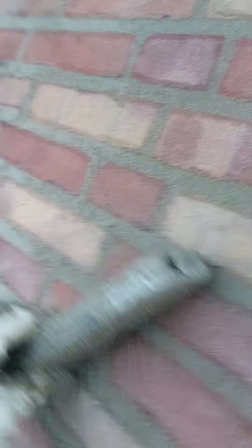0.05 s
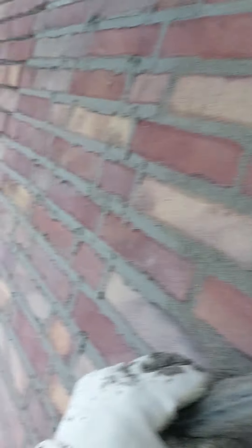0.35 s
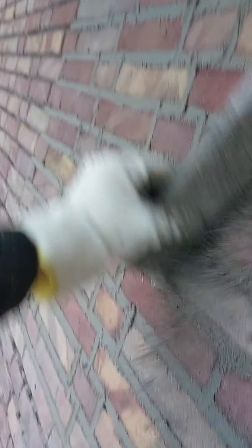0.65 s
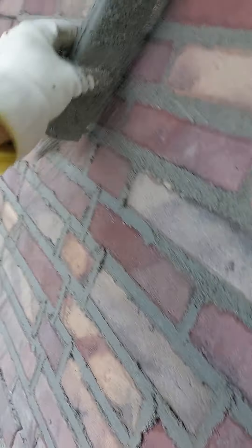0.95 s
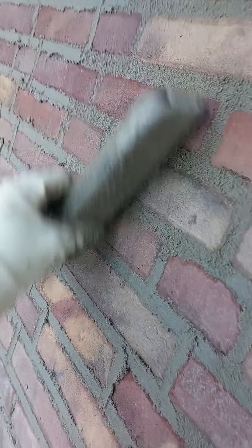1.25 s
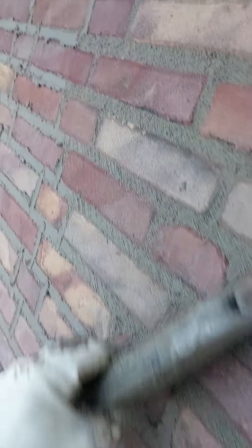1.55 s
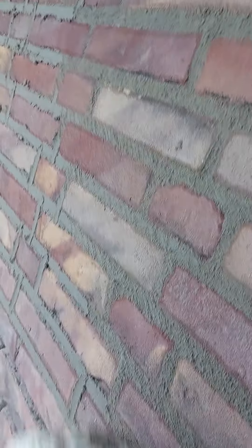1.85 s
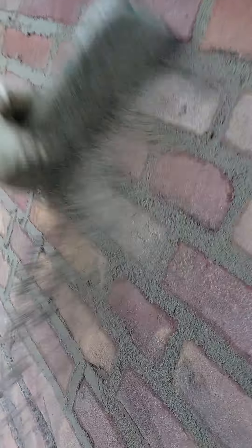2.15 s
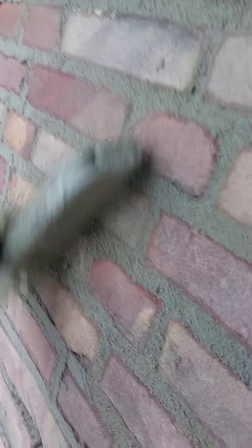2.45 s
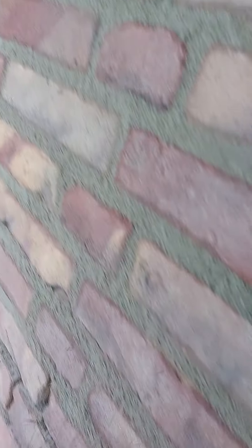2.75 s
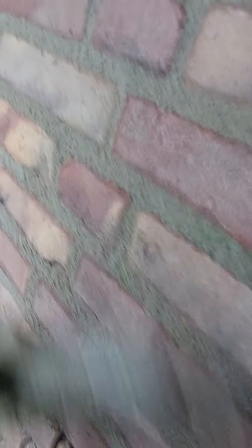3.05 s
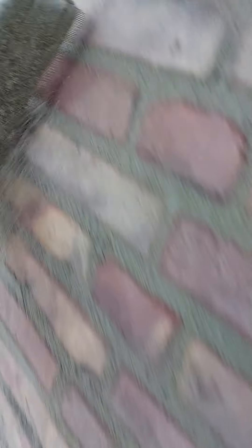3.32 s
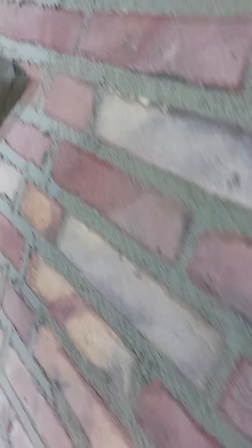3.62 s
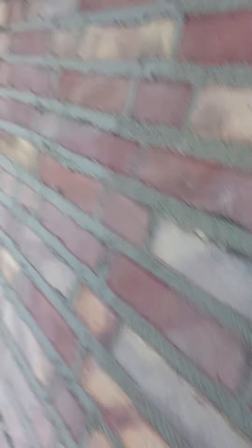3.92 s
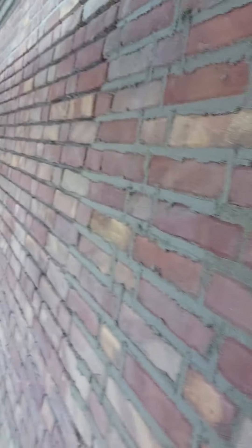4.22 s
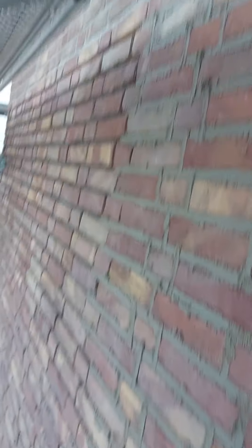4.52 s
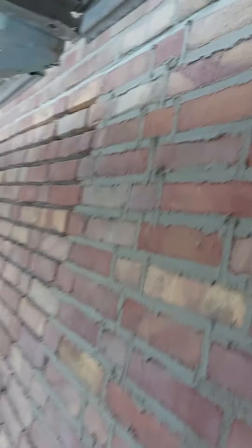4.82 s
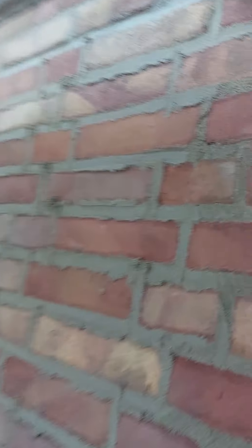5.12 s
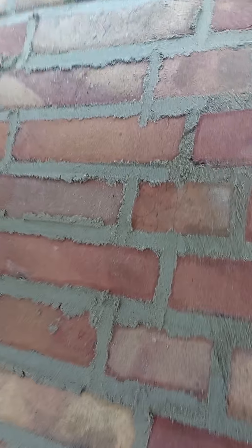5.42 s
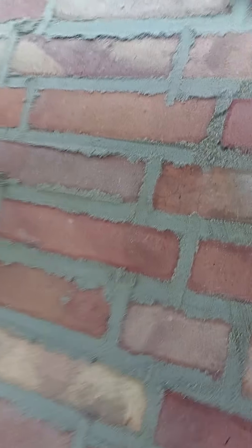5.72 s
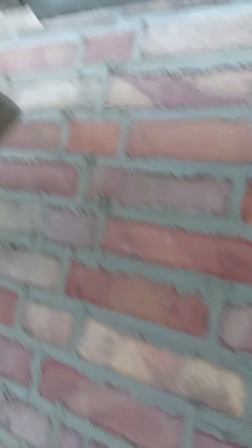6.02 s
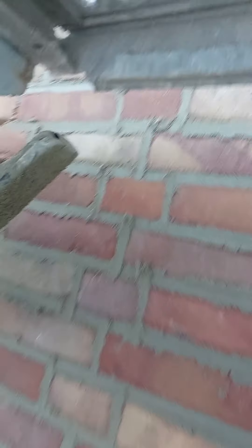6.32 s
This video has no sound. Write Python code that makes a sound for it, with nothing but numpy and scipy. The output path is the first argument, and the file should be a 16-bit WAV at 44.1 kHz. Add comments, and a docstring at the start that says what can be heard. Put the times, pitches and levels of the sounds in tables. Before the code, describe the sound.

Close, raspy brush strokes scour a brick wall outdoors, then a sleeve rustles and footsteps thud on boards, with a sharp knock.

```python
"""A stiff hand brush scrubs fresh mortar joints on a brick wall, six strokes down and up, close by.
Bristles flick over the grit, hissing, rasping and ringing the brush's wooden back, and the sound swings
between the two microphone ports of a hand-held camera. Then the worker shifts along the wall: a sleeve
rustles, crumbs of mortar tick, steps thud on boards and one sharp knock rings out.
A low outdoor rumble lies under it all."""
import sys
import numpy as np
from scipy import signal
from scipy.fft import rfft, irfft, next_fast_len
from scipy.io import wavfile
from scipy.ndimage import uniform_filter1d, map_coordinates

SR = 44100
rng = np.random.default_rng(int(sys.argv[2]) if len(sys.argv) > 2 else 0)


def master_out(mix):
    """Clip the mix to full scale and print it as 16-bit PCM to the path in sys.argv[1]."""
    frames = np.transpose(np.atleast_2d(mix))
    ceiling = np.clip(frames, -1, 1)
    pcm = np.round(ceiling * 32767).astype(np.int16)
    wavfile.write(sys.argv[1], SR, pcm)


N = 280917

# The brush strokes, down and up in turn. Each row: start, end, rise and fall in seconds,
# levels of bristle hiss, wooden back and sand rasp in dB, height reached from 0 to 1.
STROKES = [(-0.07, 0.467, 0.082, 0.29, -31.5, -35.5, -39.5, .33),
           (0.488, 0.987, 0.11, 0.067, -27.5, -30, -35.5, 0.98),
           (1.025, 1.907, 0.08, 0.02, -28.5, -32.5, -36.5, .22),
           (1.921, 2.338, 0.13, 0.057, -25.5, -30.5, -33.5, 0.92),
           (2.349, 3.008, 0.094, 0.14, -26, -31.5, -34, 0.06),
           (3.102, 3.402, 0.033, .026, -24.5, -30, -32, .8)]
# How alike the two ports hear the brush, rub and knock. Each row: frequency in Hz, likeness from 0 to 1.
CLOSE_LIKENESS = [(300, 1), (700, 0.9), (1100, 0.76), (2000, 0.5), (3000, 0.2), (6000, 0), (14000, 0)]
# The same for the rumble, hand shake and scuffs. Each row: frequency in Hz, likeness from 0 to 1.
LOW_LIKENESS = [(25, .75), (60, 0.8), (125, 0.91), (250, 0.9), (700, 0.5), (2000, 0.2)]
# The bright tone of sleeve swish and crumbs. Each row: frequency in Hz, level in dB.
SWISH_SPECTRUM = [(1300, -35), (2300, 0), (3000, -6.5), (4500, -4.5), (6500, -9), (10000, -11), (13000, -6),
                  (16000, -10.5)]
# The gritty tone of a scuffing sole and the knock's crack. Each row: frequency in Hz, level in dB.
SCUFF_SPECTRUM = [(200, 2.5), (500, 0.5), (1000, 0), (1900, -1.5), (2400, -9.5), (3000, -14), (4500, -15),
                  (8000, -20.5), (16000, -41)]


def amp(db):
    """Decibels to gain."""
    return np.exp(np.asarray(db) * (np.log(10) / 20))


def unit(x):
    """Scale to rms 1."""
    return x / np.sqrt(np.mean(x ** 2) + 1e-20)


def along(points, hz):
    """Read a curve of (Hz, value) points on a log frequency axis."""
    freqs, values = np.transpose(points)
    return np.interp(np.log(hz + 1), np.log(freqs + 1), values)


def wobble(per_second):
    """A smooth curve through so many random knots a second."""
    knots = rng.standard_normal(int(N * per_second / SR) + 4)
    coarse = np.arange(0, N, 16)
    return np.interp(np.arange(N), coarse, map_coordinates(knots, [coarse * per_second / SR]))


def swell(middle, width):
    """A bell-shaped rise and fall; middle and width in seconds."""
    return np.exp(-((np.arange(N) / SR - middle) / width) ** 2)


def filtered(x, response):
    """Filter x by a gain given as a function of Hz."""
    size = x.shape[-1]
    padded = next_fast_len(size + 8192)
    return irfft(rfft(x, padded) * response(np.fft.rfftfreq(padded, 1 / SR)), padded)[..., :size]


def coloured(x, spectrum):
    """Equalise x with a curve of (Hz, dB) points, at rms 1."""
    return unit(filtered(x, lambda hz: amp(along(spectrum, hz))))


def patchy(x, depth_db):
    """Give x patches of colour that come and go, as in a cluttered space."""
    bins = signal.stft(x, nperseg=512)[2]
    patches = uniform_filter1d(rng.standard_normal(bins.shape), size=3, axis=1)
    patches = uniform_filter1d(patches, size=14, axis=2)
    return unit(signal.istft(bins * amp(depth_db * unit(patches)), nperseg=512)[1][:, :N])


def paired(x, likeness):
    """Blend two unrelated signals into a left and right of the given likeness."""
    angle = lambda hz: np.arccos(np.clip(along(likeness, hz), -1, 1)) / 2
    mid, side = filtered(x, lambda hz: np.array([np.cos(angle(hz)), np.sin(angle(hz))]))
    return np.array([mid + side, mid - side])


def stereo_noise(spectrum, likeness, size=N):
    """Noise of the given tone and left-right likeness, at rms 1."""
    return coloured(paired(rng.standard_normal((2, size)), likeness), spectrum)


def delayed(x, ms):
    """One channel through a steady or moving delay."""
    return map_coordinates(x, [np.arange(N) - ms * SR / 1000], order=3)


def add(track, start, sound):
    """Mix a sound into a track, start in seconds."""
    part = track[..., round(start * SR):][..., :sound.shape[-1]]
    part += sound[..., :part.shape[-1]]


def flicks(per_second, spread_db):
    """Two streams of tiny snaps at random moments, of log-normal size."""
    fired = rng.random((2, N)) < per_second / SR
    sign = np.sign(rng.random((2, N)) - .5)
    return unit(fired * sign * amp(spread_db * rng.standard_normal((2, N))))


def arm(start_height=.62):
    """The arm sweeps the brush: its height about the middle, 1 while it goes up, and how far it leans in."""
    t = np.arange(N) / SR
    height, upward, lean = np.full(N, start_height), np.zeros(N), np.zeros(N)
    before = start_height
    for start, end, *_, reached in STROKES:
        progress = np.clip((t - start) / (end - start), 0, 1)
        height += (reached - before) * (1 - np.cos(np.pi * progress)) / 2
        lean += np.sin(np.pi * progress)
        upward[t >= start] = reached > before
        before = reached
    return height - .5, uniform_filter1d(upward, size=1024), lean


def friction(turn_dip_db=19.5, wood_lag_s=0.022, trickle_db=-26, trickle_t60=.25):
    """Envelopes of hiss, back and rasp: each stroke rises, holds and falls, and snags add short surges."""
    # Tufts snag on a joint or flip over at a turn.
    # Each row: middle and width in seconds, hiss and wood levels in dB.
    snags = [(0.39, 0.075, -41.5, -50), (0.51, 0.021, -34.5, -41.5), (0.569, 0.029, -25.5, -43),
             (0.705, 0.011, -42, -31), (1.019, 0.016, -44, -40), (1.767, 0.077, -33, -43.5),
             (1.924, 0.017, -39, -40), (2.178, 0.027, -37.5, -33), (2.357, 0.023, -37, -37.5),
             (2.783, 0.066, -33.5, -30), (2.888, 0.017, -28, -28.5), (2.925, 0.03, -46.5, -27),
             (2.974, .009, -34, -39.5), (3.005, 0.017, -33.5, -35.5), (3.188, 0.032, -28.5, -33)]
    t, power = np.arange(N) / SR, np.zeros((3, N))
    lag = np.array([[0], [wood_lag_s], [0]])  # the tips touch first; the back sounds as the hand leans in
    for start, end, rise, fall, hiss_db, wood_db, rasp_db, _ in STROKES:
        slack = np.maximum(1 - (t - start) / (rise + lag), 0) + np.maximum(1 - (end - t) / fall, 0)
        contact = amp(-turn_dip_db * slack ** 2)
        sand_trickle = (t > end) * amp(trickle_db - 60 * np.abs(t - end) / trickle_t60)
        power += (amp([[hiss_db], [wood_db], [rasp_db]]) * np.maximum(contact, sand_trickle)) ** 2
    for middle, width, hiss_db, wood_db in snags:
        rasp_db = (hiss_db + wood_db) / 2 - 0.5
        power += (amp([[hiss_db], [wood_db], [rasp_db]]) * swell(middle, width)) ** 2
    return np.sqrt(power)


def wooden_back(snaps, pressure_db, low_cut_hz=570):
    """The brush's back rings briefly; pressing harder wakes its upper resonances."""
    # Each row: resonance and bandwidth in Hz, level in dB, dB gained per dB of pressure.
    resonances = [(744, 154, 1.5, 0.5), (995, 330, -1.5, 1.57), (1220, 460, -14, 5.5)]
    radiated = lambda hz: hz ** 3 / np.sqrt(hz ** 6 + low_cut_hz ** 6)  # too small to radiate bass
    out = 0
    for k, (centre, width, db, gain) in enumerate(resonances):
        resonance = lambda hz: 1j * hz * width / (centre ** 2 - hz ** 2 + 1j * hz * width)
        ring = filtered(snaps, lambda hz: radiated(hz) * resonance(hz))
        out = out + (-1) ** k * amp(db + gain * pressure_db) * ring
    return unit(out)


def hand_shake(wood_level, follow_db=-18.5, gain_db=1):
    """The gloved hand shakes with the brush's back and takes a few jolts: a low, dragging noise."""
    # Jolts of the hand. Each row: middle and width in seconds, level in dB.
    jolts = [(0.04, 0.047, -41.5), (1.525, 0.1, -43), (2.712, .08, -54), (3.438, 0.036, -48)]
    # The tone of the shaken hand. Each row: frequency in Hz, level in dB.
    drag_spectrum = [(25, -51), (50, -30), (115, -1.5), (180, -4.5), (255, 3), (340, -7), (550, -15),
                     (1200, -48.5)]
    jolting = sum(amp(db) * swell(middle, width) for middle, width, db in jolts)
    shaking = wood_level * amp(follow_db) + jolting
    return shaking * amp(gain_db) * stereo_noise(drag_spectrum, LOW_LIKENESS)


def brush(hiss_far_db=-1.5, wood_far_db=-2.5, pan_drift_db_per_s=-0.94):
    """Bristles catch on the grit and snap free, while the brush travels past the ports."""
    # The tones of sand dragged over brick, of the bristle tips and of the finest tips.
    # Each row: frequency in Hz, level in dB.
    rasp_spectrum = [(150, -57), (450, -15.5), (900, -12.5), (1250, -1.5), (1550, -1.5), (2000, 1.5),
                     (2300, 2), (2700, -14.5), (4000, -29.5)]
    hiss_spectrum = [(1500, -37), (2600, -7.5), (3300, -4), (3700, -5), (4200, -2), (6000, -4.5),
                     (7500, -4.5), (8700, -2.5), (9700, -10.5), (12500, -3), (16000, -8)]
    sizzle_spectrum = [(7000, -28), (9700, -7.5), (11500, -5.5), (13300, -2.5), (16000, -4)]
    height, upward, lean = arm()
    pressure_db = .5 + 1.5 * height - 1.2 * upward + 2 * lean
    sizzle_db = 2 - 6.5 * height + 2 * upward
    # the higher the brush, the farther away it is
    distance_gain = amp(np.outer([hiss_far_db, wood_far_db, wood_far_db], height))
    hiss_level, wood_level, rasp_level = friction() * distance_gain
    snaps = lambda per_second: paired(flicks(per_second, spread_db=2), CLOSE_LIKENESS)
    back = wood_level * amp(-0.5) * wooden_back(snaps(6000), pressure_db)
    rasp = rasp_level * patchy(coloured(snaps(8000), rasp_spectrum), depth_db=3.5)
    hiss = hiss_level * patchy(coloured(snaps(20000), hiss_spectrum), depth_db=3)
    fine_tips = flicks(24000, spread_db=1.5)  # unrelated at the two ports
    sizzle = hiss_level * amp(sizzle_db) * patchy(coloured(fine_tips, sizzle_spectrum), depth_db=0.5)
    # the camera shades the treble at the far port, and slowly turns toward the brush
    pan_db = 5.5 + 5 * height + 2 * upward + pan_drift_db_per_s * np.arange(N) / SR
    treble = (hiss + sizzle) * amp(np.array([pan_db, -pan_db]) / 2)
    drag = hand_shake(wood_level)
    grip = amp(.45 * wobble(45) + .8 * wobble(260))  # whole tufts catch and let go together
    left, right = grip * (back + rasp + treble + drag)
    left_lead_ms = 0.039 + 0.572 * height + 0.01 * upward
    return np.array([delayed(left, -left_lead_ms / 2), delayed(right, left_lead_ms / 2)])


def outdoors(rumble_db=-46.5, swell_db=1, hiss_db=-76):
    """Low, distant rumble, nearly the same at both ports, under a faint hiss."""
    # The tone of the open air. Each row: frequency in Hz, level in dB.
    rumble_spectrum = [(18, -56.5), (30, -22), (50, -4), (70, -2.5), (115, -0.5), (175, -9), (240, -7),
                       (370, -9.5), (600, -17), (900, -18.5), (1600, -28), (2400, -41), (4000, -78)]
    rumble = stereo_noise(rumble_spectrum, LOW_LIKENESS) * amp(rumble_db + swell_db * wobble(6.3))
    return rumble + amp(hiss_db) * rng.standard_normal((2, N))


def clothing(rub_gain_db=1, swish_gain_db=3, crease_db=1.65, scrape_gain_db=-7):
    """A sleeve rubs and swishes as the arm moves, with a few short scrapes."""
    # Sleeve movements. Each row: middle and width in seconds, rub and swish levels in dB.
    moves = [(3.582, 0.055, -63, -64), (3.87, 0.13, -61, -66.5), (4.173, .13, -51.5, -53.5),
             (4.48, 0.21, -60.5, -76.5), (5.082, 0.16, -46.5, -55), (5.575, .13, -46, -47.5),
             (5.763, 0.081, -51, -52.5), (5.948, 0.087, -52, -62.5), (6.173, 0.072, -76, -69.5),
             (6.356, 0.074, -56, -53.5)]
    # Scrapes of glove and sleeve.
    # Each row: start in seconds, level in dB, relative treble in dB, rise and t60 in seconds.
    scrapes = [(3.079, -28.5, -10, .001, 0.082), (3.441, -32.5, -9, 0.0012, 0.14),
               (4.314, -32.5, -23, .001, 0.048), (4.761, -46, -31.5, 0.00095, .04),
               (5.235, -27, -12.5, 0.0067, 0.15), (5.337, -30, -47, 0.0022, 0.3),
               (5.58, -29, -2, 0.008, 0.095), (5.721, -24, -17, .003, .11),
               (6.339, -22.5, -11, .001, 0.057)]
    # The dull tone of rubbing cloth. Each row: frequency in Hz, level in dB.
    rub_spectrum = [(300, 3), (700, 1.5), (1200, 4), (1900, 3.5), (2300, -6.5), (2900, -14), (5000, -36)]
    rubbing = sum(amp(db + rub_gain_db) * swell(middle, width) for middle, width, db, _ in moves)
    swishing = sum(amp(db + swish_gain_db) * swell(middle, width) for middle, width, _, db in moves)
    t = np.arange(SR // 2) / SR
    for start, db, treble_db, rise, t60 in scrapes:
        scrape = amp(db + scrape_gain_db - 60 * t / t60) * (1 - np.exp(-t / rise))
        add(rubbing, start, scrape)
        add(swishing, start, scrape * amp(treble_db))
    rub = rubbing * patchy(stereo_noise(rub_spectrum, CLOSE_LIKENESS), depth_db=2.5)
    swish = swishing * patchy(coloured(rng.standard_normal((2, N)), SWISH_SPECTRUM), depth_db=1.5)
    return (rub + swish) * amp(crease_db * wobble(70))


def crumbs(gain_db=-8, t60=0.078):
    """Loose bits of mortar tick as they land."""
    # Each row: landing time in seconds, level in dB.
    landings = [(3.0986, -32), (3.555, -48.5), (3.612, -46), (3.747, -46), (4.876, -53), (4.907, -47),
                (4.942, -39), (5.0809, -32), (5.141, -30), (5.105, -35), (5.407, -44), (5.8815, -40),
                (5.9696, -42), (6.107, -44.5)]
    level, t = np.zeros(N), np.arange(SR // 4) / SR
    for start, db in landings:
        add(level, start, amp(db + gain_db - 60 * t / t60))
    return level * coloured(rng.standard_normal((2, N)), SWISH_SPECTRUM)


def steps(thud_db=-7, upper_gain_db=5, scuff_db=-7, rise_s=0.0037, scuff_t60=0.19, low_cut_hz=55):
    """Heel, ball and toe of each footfall thud on the boards and scuff a little grit."""
    # Each row: start and heel-to-toe roll in seconds, heel, ball and toe levels in dB,
    # trims for the upper modes and the scuff in dB, t60 in seconds.
    footfalls = [(3.806, 0.096, -31, -41, -35.5, -5, -10.5, 0.3),
                 (4.194, .1, -27, -39, -29, -10.5, -6.5, 0.53),
                 (5.075, 0.072, -13.5, -16, -11.5, -13, -14, 0.23),
                 (5.252, .155, -28, -33, -32, -12, -17, 0.51),
                 (5.697, .069, -19.5, -23.5, -22, -6, -5.5, 0.27),
                 (6.254, 0.075, -19, -19, -10, -14, -18, 0.19)]
    # The modes of the boards. Each row: frequency in Hz, level in dB, share of the footfall's t60.
    board_modes = [(71, -15, 0.46), (94, -3, 1), (120.6, -1, 1), (151.8, 0, 0.52), (243.9, 0, 0.95),
                   (275, -3.5, 0.75), (375, -6, 0.6)]
    thuds, scuffing, t = np.zeros(N), np.zeros(N), np.arange(SR // 2) / SR
    onset = 1 - np.exp(-t / rise_s)
    hz, mode_db, share = np.transpose(board_modes)[:, :, None]
    upper = hz > 200
    for start, roll, heel_db, ball_db, toe_db, upper_db, grit_db, t60 in footfalls:
        decay = amp(mode_db + upper * (upper_db + upper_gain_db) - 60 * t / (t60 * share))
        for touch, db in (start, heel_db), (start + .42 * roll, ball_db), (start + roll, toe_db):
            detune = 1 + 0.035 * rng.standard_normal(hz.shape)
            modes = decay * np.sin(2 * np.pi * hz * detune * t)
            add(thuds, touch, amp(db + thud_db) * modes.sum(axis=0) * onset)
            add(scuffing, touch, amp(db + grit_db + scuff_db - 60 * t / scuff_t60) * onset)
    # narrow boards radiate no deep bass
    thuds = signal.sosfilt(signal.butter(2, low_cut_hz, "high", fs=SR, output="sos"), thuds)
    grit = coloured(paired(flicks(4000, spread_db=0), LOW_LIKENESS), SCUFF_SPECTRUM)
    return thuds + scuffing * grit


def knock(ring_db=-10, crack_db=-9, crack_t60=0.082, scatter_db=-27, scatter_t60=0.85):
    """A hard blow: a crack, a short ring and a faint scatter from the wall."""
    # Each row: time of the blow in seconds, level in dB.
    blows = [(5.14, -9)]
    # The modes it rings. Each row: frequency in Hz, level in dB, t60 in seconds.
    ring_modes = [(378, -8, 0.1), (481, -13, 0.25), (650, -12, 0.091), (1180, 4.5, 0.077),
                  (1350, -4, 0.057), (1590, -4, 0.066), (1875, 5, 0.035), (2290, 1, 0.035),
                  (3240, -5.5, .05), (3800, -7, .05), (4370, -15, 0.06)]
    out, t = np.zeros((2, N)), np.arange(SR // 2) / SR
    for start, db in blows:
        ring = sum(amp(mode_db - 60 * t / t60) * np.sin(2 * np.pi * (hz * t + rng.random()))
                   for hz, mode_db, t60 in ring_modes)
        noise = stereo_noise(SCUFF_SPECTRUM, CLOSE_LIKENESS, len(t))
        fade = amp(crack_db - 60 * t / crack_t60) + amp(scatter_db - 60 * t / scatter_t60)
        add(out, start, amp(db) * (amp(ring_db) * ring + fade * noise))
    return out


def scene(left_lag_ms=0.422):
    """Brushing, then moving on; the worker's own noises reach the right port first."""
    left, right = steps() + knock() + clothing()
    worker = np.array([delayed(left, left_lag_ms), right])
    return brush() + worker + crumbs() + outdoors()


def record(dry, top_hz=15760):
    """Each microphone port has its own colour, and the top end is cut steeply."""
    # The balance of the ports. Each row: frequency in Hz, left minus right in dB.
    port_balance = [(100, -0.5), (700, -1.5), (1200, -4), (1900, -8), (2400, -3.5), (2900, 1), (4500, -1.5),
                    (6000, 4), (7800, 7.5), (9800, -1.5), (12500, -4), (15500, -3)]

    def ports(hz):
        ratio = amp(along(port_balance, hz))
        return np.array([ratio, np.ones_like(hz)]) * np.sqrt(2 / (1 + ratio ** 2))
    low_pass = lambda hz: (1 - np.tanh((hz - top_hz) / 60)) / 2
    return filtered(dry, lambda hz: ports(hz) * low_pass(hz))


dry = scene()
out = record(dry)
master_out(out)
```